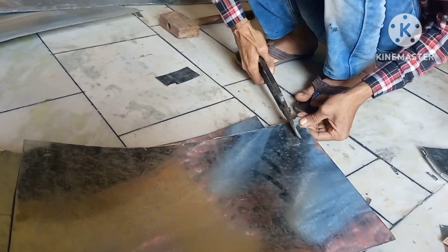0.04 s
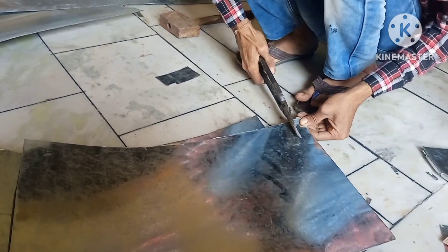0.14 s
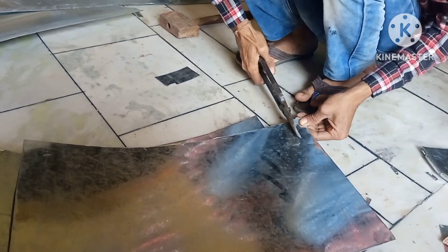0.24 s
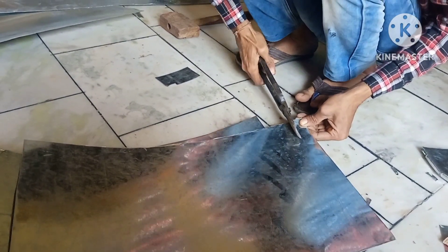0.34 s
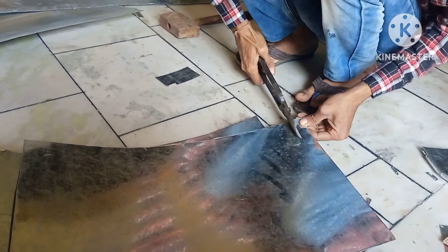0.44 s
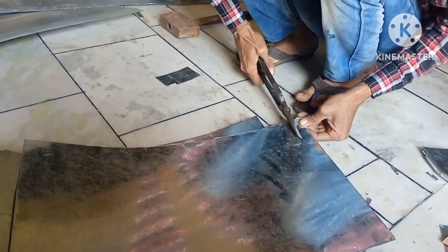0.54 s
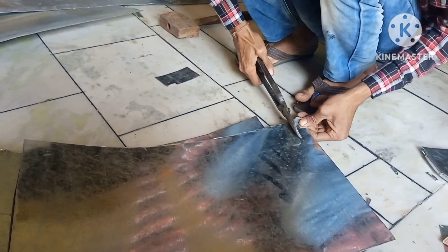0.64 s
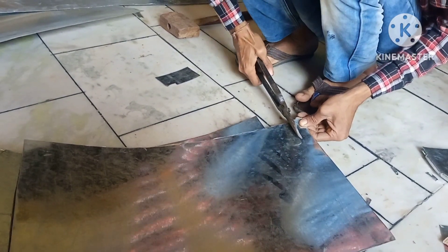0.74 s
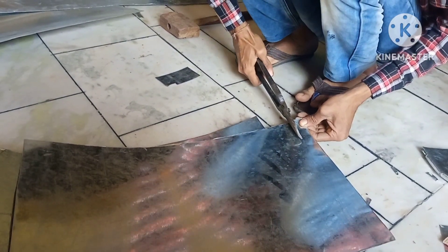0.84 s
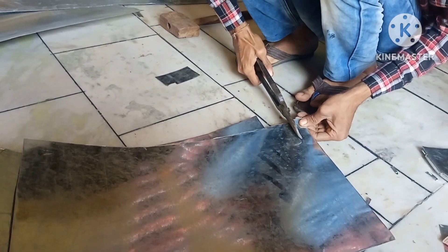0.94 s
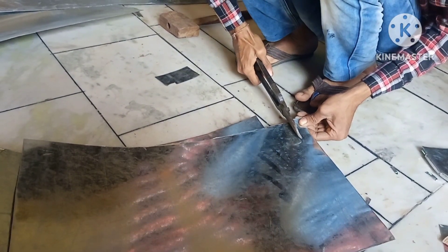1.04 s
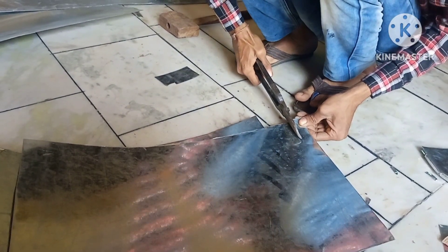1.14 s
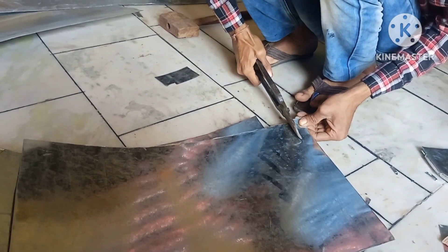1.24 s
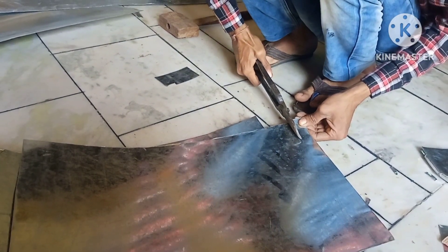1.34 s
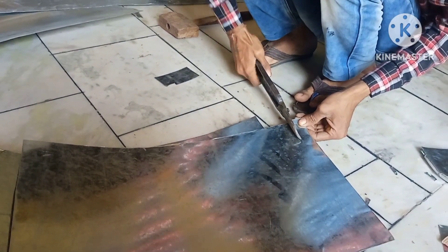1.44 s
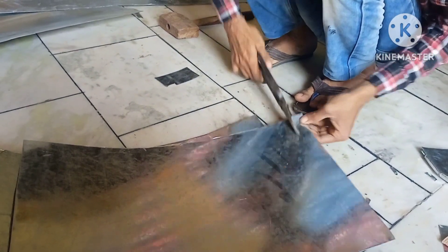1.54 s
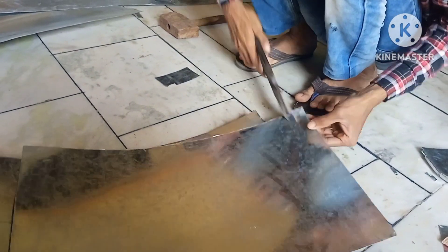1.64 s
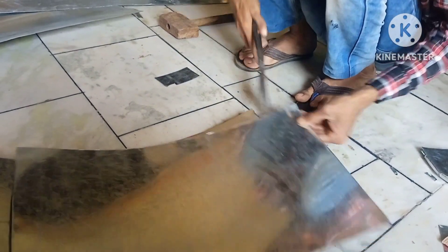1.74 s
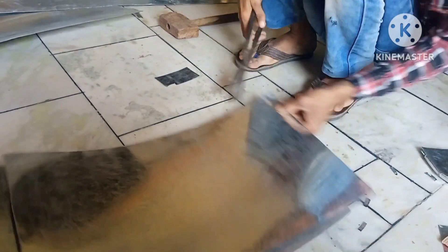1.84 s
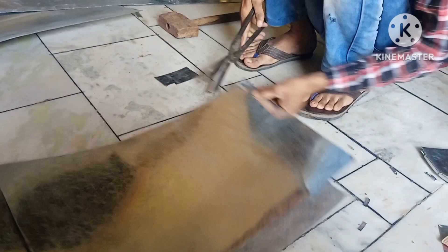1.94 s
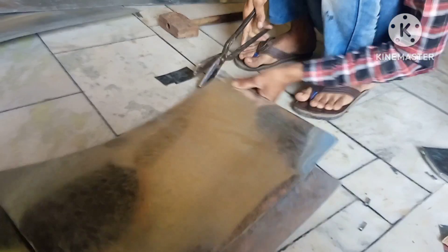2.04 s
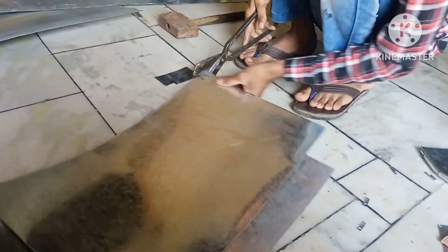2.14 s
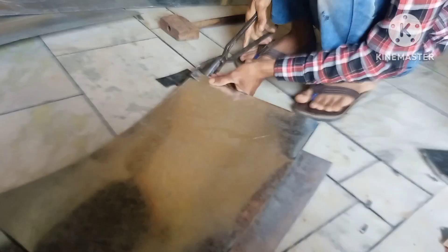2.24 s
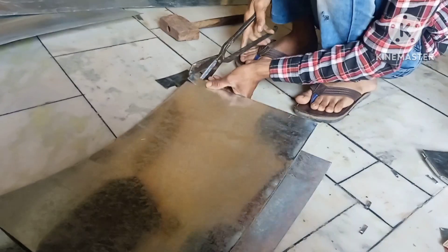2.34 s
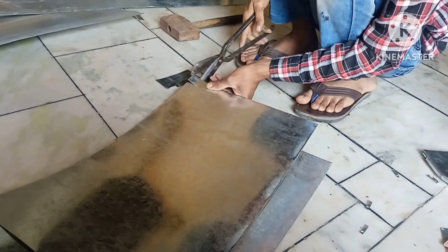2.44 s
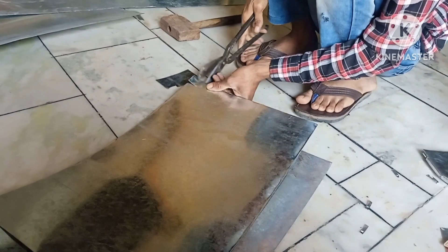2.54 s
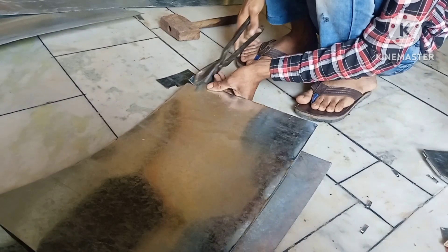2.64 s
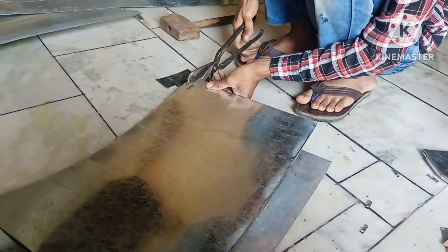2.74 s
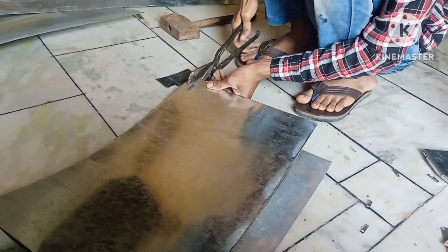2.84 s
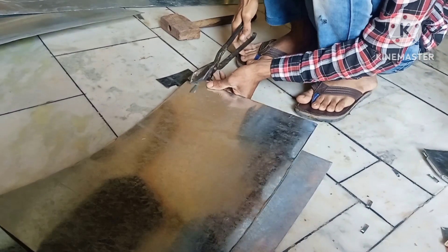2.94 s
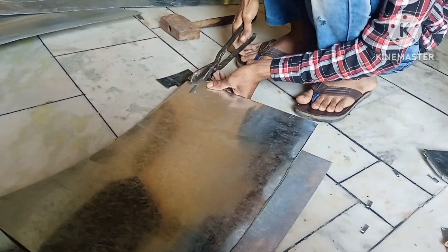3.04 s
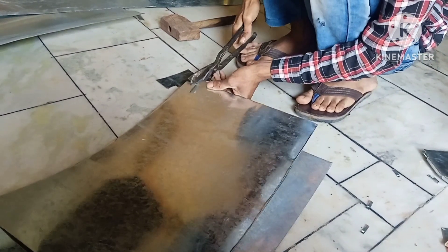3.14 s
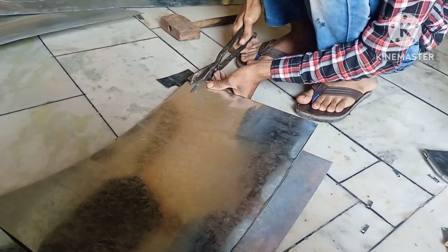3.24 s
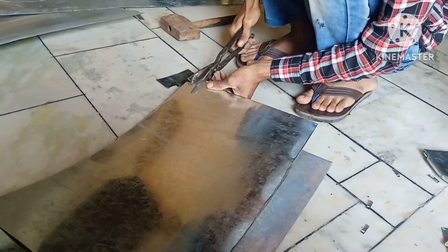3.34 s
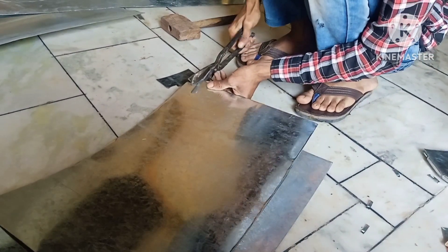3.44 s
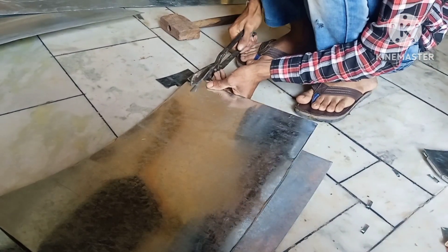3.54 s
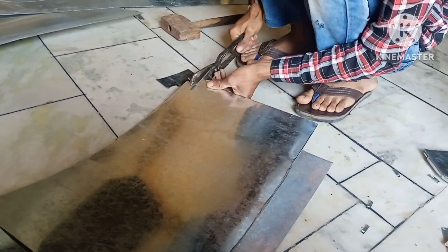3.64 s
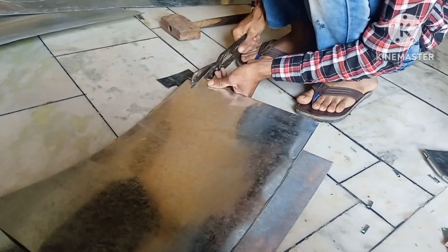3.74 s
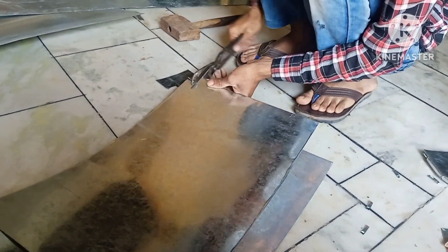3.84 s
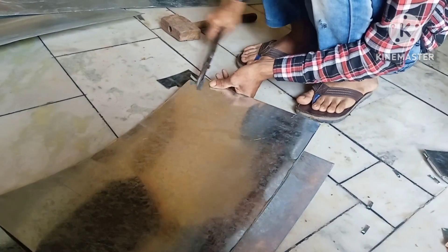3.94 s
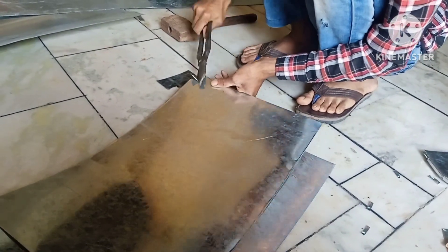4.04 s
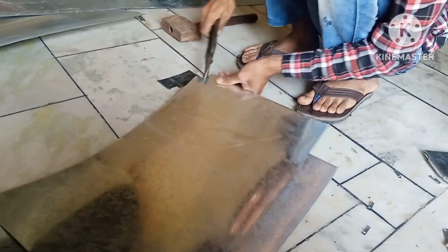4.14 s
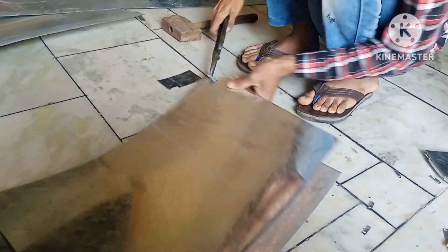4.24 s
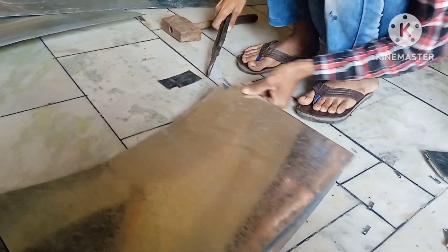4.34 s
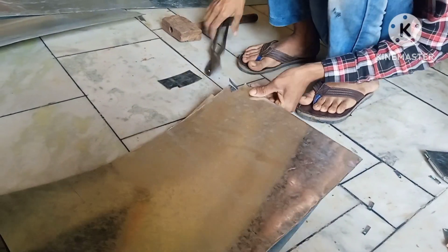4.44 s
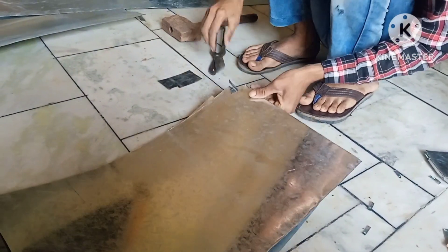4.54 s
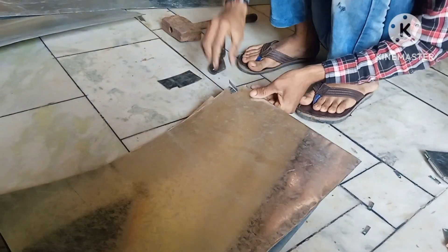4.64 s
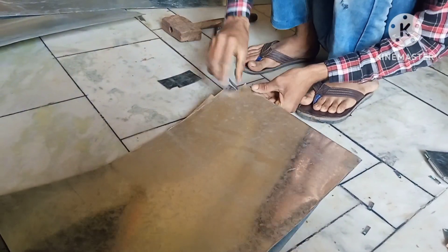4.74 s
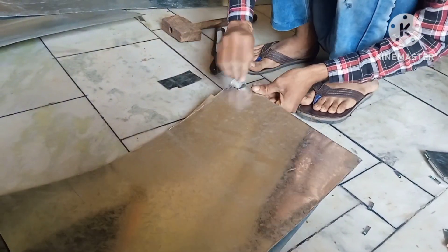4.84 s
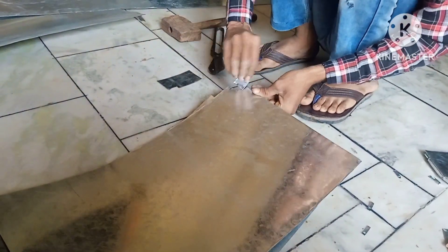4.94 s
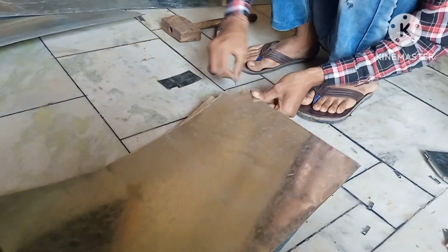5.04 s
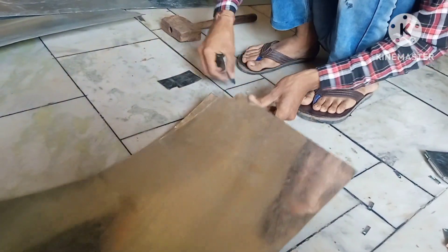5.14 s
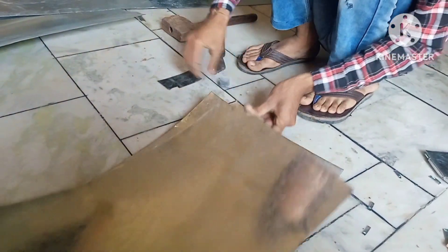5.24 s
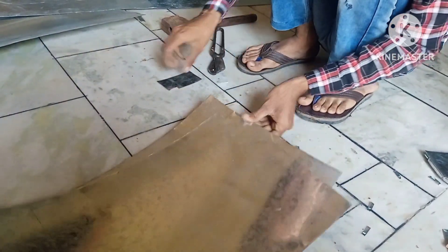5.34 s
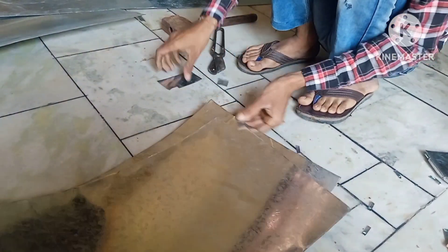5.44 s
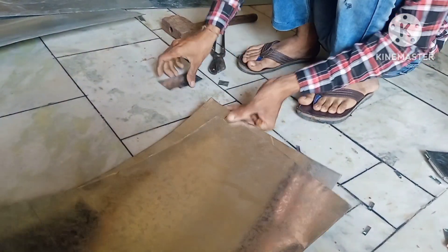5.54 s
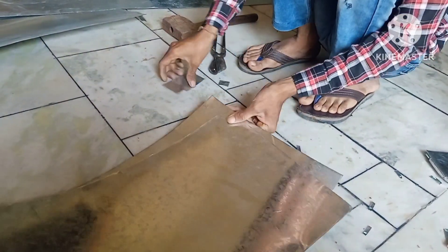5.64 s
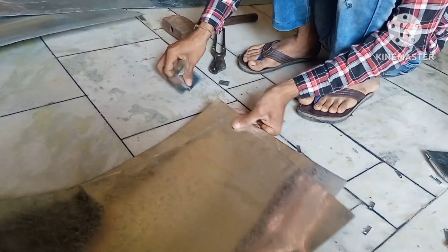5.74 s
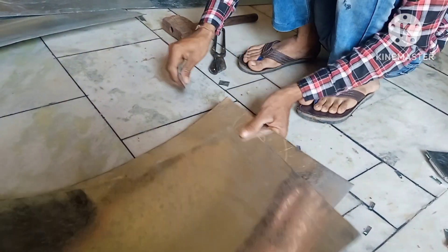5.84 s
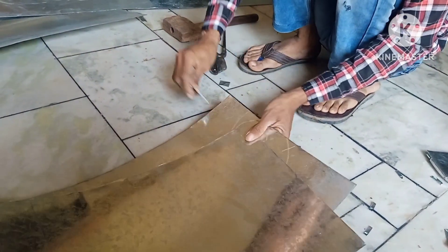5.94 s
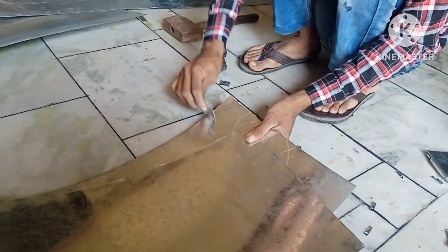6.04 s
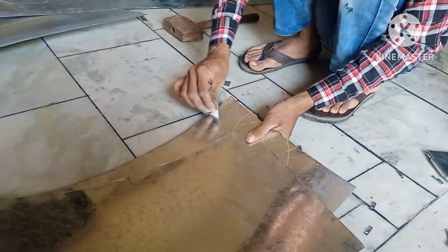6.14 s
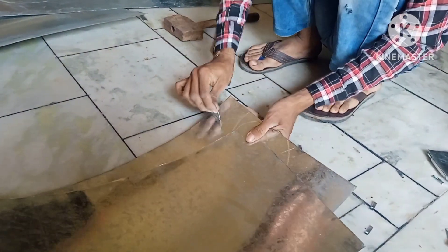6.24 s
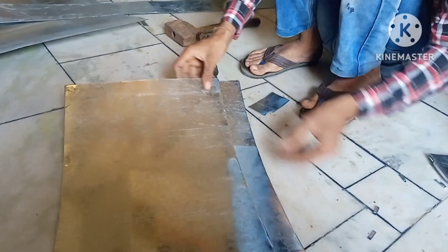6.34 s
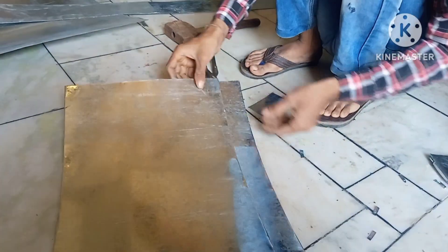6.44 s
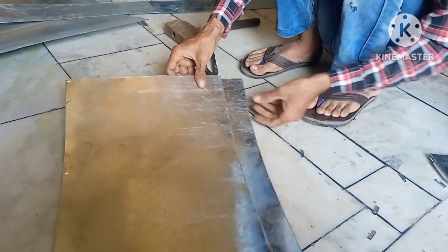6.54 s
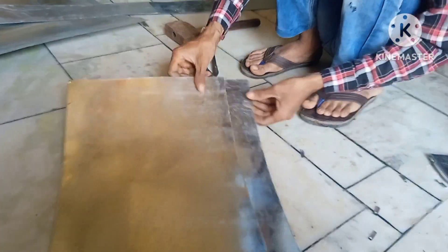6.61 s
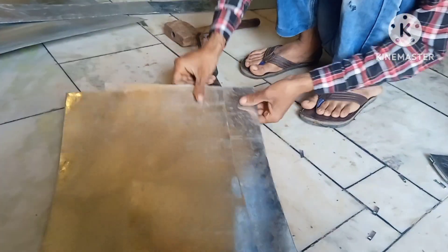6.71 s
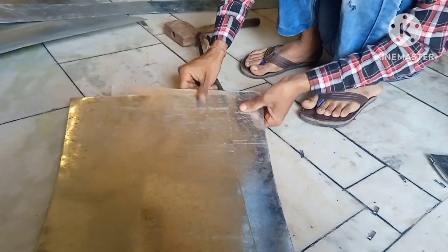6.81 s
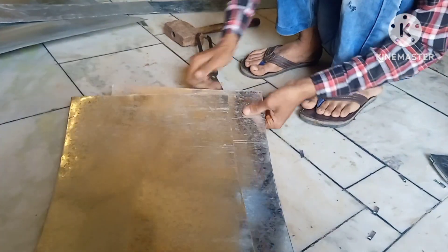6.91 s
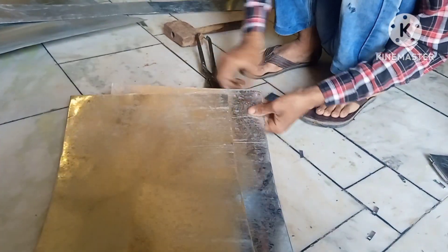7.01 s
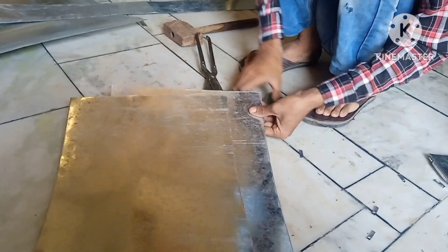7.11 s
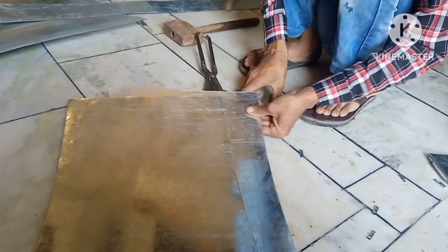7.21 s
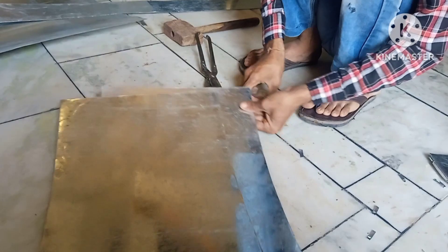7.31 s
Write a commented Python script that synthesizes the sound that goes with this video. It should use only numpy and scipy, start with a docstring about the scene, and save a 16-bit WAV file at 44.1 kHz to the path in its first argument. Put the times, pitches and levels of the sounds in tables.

```python
"""A thin galvanised sheet is dragged round in pushes on a tiled workshop floor and cut with tin snips.
Close to the microphone its edge sticks and slips, the plate shimmers, and it twangs in the blades.
The snips are put down and clatter on the tiles, a small offcut rings as it is scraped up,
and the sheet slaps down and slides. Farther off, hard walls answer over a low rumble."""
import sys
import numpy as np
from scipy import signal
from scipy.fft import rfft, irfft, next_fast_len
from scipy.io import wavfile

SR = 44100
rng = np.random.default_rng(int(sys.argv[2]) if len(sys.argv) > 2 else 0)


def bounce(signal):
    """Save signal as a 16-bit WAV file at the path given by the first command-line argument."""
    frames = np.transpose(np.atleast_2d(signal))
    limited = np.clip(frames, -1, 1)
    pcm = np.round(limited * 32767).astype(np.int16)
    wavfile.write(sys.argv[1], SR, pcm)


N = 325017


def amp(db):
    """Decibels to gain."""
    return 10 ** (np.asarray(db) / 20)


def unit(x):
    """Scale to rms 1."""
    return x / np.sqrt(np.mean(x ** 2) + 1e-20)


def along(points, hz):
    """Read a curve of (Hz, value) points on a log frequency axis."""
    freqs, values = np.transpose(points)
    return np.interp(np.log(hz + 1), np.log(freqs + 1), values)


def coloured(x, spectrum):
    """x through a causal filter with the given spectrum, at rms 1."""
    size = 4096
    gain = amp(along(spectrum, np.fft.rfftfreq(size, 1 / SR)))
    cepstrum = irfft(np.log(gain))
    cepstrum[1:size // 2] *= 2  # fold to minimum phase
    cepstrum[size // 2 + 1:] = 0
    response = irfft(np.exp(rfft(cepstrum)))
    return unit(signal.fftconvolve(x, response)[:len(x)])


def add(track, s, sound):
    """Mix a sound in at s seconds."""
    start = max(round(s * SR), 0)
    track[start:start + len(sound)] += sound[:N - start]


def burst(spectrum, t60, rise=0.00096):
    """A blow on countless overlapping modes that die together."""
    t = np.arange(SR // 2) / SR
    envelope = amp(-60 * t / t60) * np.minimum(t / rise, 1)
    return coloured(envelope * rng.standard_normal(len(t)), spectrum) * np.sqrt(np.mean(envelope ** 2))


def wobble(count, rate, size):
    """Smooth random curves of size samples, rate knots a second."""
    knots = np.arange(size) * rate / SR
    grid = np.arange(int(knots[-1]) + 2)
    return np.array([np.interp(knots, grid, rng.standard_normal(len(grid))) for _ in range(count)])


def ring(modes, sustain, rise, waver_hz):
    """A blow on clear modes whose pitch wavers as the contact shifts; sustain scales each base t60."""
    t = np.arange(SR // 2) / SR
    hz, db, t60 = np.transpose(modes)[:, :, None]
    gain = amp(db + 2 * rng.standard_normal(hz.shape))
    pitch = hz + waver_hz * wobble(count=len(hz), rate=119, size=len(t))
    phase = 2 * np.pi * (rng.random(hz.shape) + np.cumsum(pitch, axis=1) / SR)
    waves = gain * amp(-60 * t / (t60 * sustain)) * np.sin(phase)
    return waves.sum(0) * np.minimum(t / rise, 1) / np.sqrt(np.sum(gain ** 2) / 2)


def stroke(start, swell, hold, swell_db=15.5, ring_off_db_per_s=108):
    """Level in dB of one scrape: it gathers speed, holds, and the metal rings off."""
    t = np.arange(N) / SR - start
    gathering = np.clip(t / swell, 0, 1)
    stopped_s = np.maximum(t - swell - hold, 0)
    level = -swell_db * (1 - gathering) ** 1.17 - ring_off_db_per_s * stopped_s
    return np.where(t < 0, -np.inf, level)


def slips(rate, spread_db):
    """Stick-slip impulses of uneven size, rate a second."""
    size = amp(spread_db * np.minimum(rng.standard_normal(N), 2.5))
    return (rng.random(N) < rate / SR) * size * rng.choice([-1, 1], N)


def plate(x, t60, share):
    """The sheet's dense bending modes ring on after each impulse, and shift as it bends."""
    t = np.arange(SR // 4) / SR
    hop = SR // 8
    window = np.sqrt(np.hanning(2 * hop))
    out = np.zeros(N)
    for start in range(0, N, hop):
        piece = np.pad(x, hop)[start:start + 2 * hop]
        response = rng.standard_normal(len(t)) * amp(-60 * t / t60)
        rung = signal.fftconvolve(piece * window[:len(piece)], response)
        add(out, max(start - hop, 0) / SR, rung[max(hop - start, 0):])
    return unit(x) + share * unit(out)


# The metal's low flex, middle rasp and high grit. Each row: frequency in Hz, relative level in dB.
FLEX_SPECTRUM = [(100, -43.5), (180, -15.5), (260, -15.5), (340, -19), (470, -16), (600, -4), (720, 0.5),
                 (1100, 3.5), (1500, -9), (2200, -27), (5000, -69.5)]
RASP_SPECTRUM = [(500, -36.5), (1000, -20), (1450, 6.5), (1900, 7), (2500, 4), (3200, -1.5), (4200, -18),
                 (7000, -20.5), (15000, -70.5)]
GRIT_SPECTRUM = [(60, -65.5), (1500, -30), (3500, 9), (5000, 5.5), (6500, 5.5), (8500, -0.5), (11000, -3.5),
                 (13500, -12.5), (15200, 3)]
# Scrapes of metal: the sheet pushed across the floor, two faint blade scrapes, and the offcut's gritty
# scrape. Each row: start, swell and hold in seconds, flex, rasp and grit levels in dB.
METAL_SCRAPES = [ (0.0, 0.0017, 0.013, -44.5, -51.5, -67), (0.15, 0.011, .1, -56, -65.5, -81),
                 (0.92, 0.026, .02, -74, -78, -97), (1.17, 0.044, 0.023, -76, -74.5, -92),
                 (1.576, 0.044, .06, -51, -54, -64.5), (1.633, 0.067, 0.065, -50, -43.5, -45.5),
                 (1.745, 0.018, 0.046, -36, -33.5, -41.5), (1.76, 0.19, .27, -40, -34, -44),
                 (1.987, 0.18, 0.14, -41.5, -35.5, -43), (2.282, 0.0085, 0.044, -36.5, -45, -55),
                 (2.737, 0.054, 0.013, -40.5, -41.5, -55), (2.98, 0.018, 0.033, -76, -60.5, -73.5),
                 (3.492, 0.26, .035, -53, -59, -83), (3.746, 0.024, 0.052, -79, -69, -66),
                 (3.922, 0.069, 0.22, -65.5, -57, -61), (4.135, .03, 0.017, -55.5, -46.5, -53.5),
                 (4.207, 0.059, 0.069, -39.5, -36, -42), (4.886, 0.047, 0.045, -48.5, -44.5, -64),
                 (5.048, 0.0098, 0.032, -45, -48, -77), (5.136, 0.2, 0.081, -38, -35, -42),
                 (5.434, 0.019, 0.19, -74, -65, -52), (5.654, 0.018, 0.012, -42.5, -42.5, -50.5),
                 (5.747, 0.099, 0.13, -40.5, -35, -45.5), (6.163, 0.096, 0.065, -52, -36, -64),
                 (6.302, 0.012, 0.037, -42, -34.5, -41), (6.54, .03, .06, -52, -51, -57.5),
                 (6.635, 0.062, 0.028, -40.5, -39, -51), (6.786, .035, 0.02, -48, -52.5, -58),
                 (6.88, 0.073, 0.17, -68, -62.5, -72.5), (7.137, 0.19, .09, -57.5, -58, -56.5), ]


def scrapes(grit_grows=1.2):
    """Close by, scraping metal sticks and slips: fine grit on top, the plate shimmering below."""
    flex_power, rasp_power, grit_power = np.zeros((3, N))
    for start, swell, hold, flex_db, rasp_db, grit_db in METAL_SCRAPES:
        effort_db = stroke(start, swell, hold)
        flex_power += amp(effort_db + flex_db) ** 2
        rasp_power += amp(effort_db + rasp_db) ** 2
        grit_power += amp(grit_grows * effort_db + grit_db) ** 2  # grit follows the speed more steeply
    shimmer = plate(slips(rate=900, spread_db=2.5), t60=0.35, share=1.01)
    scratch = plate(slips(rate=4500, spread_db=3), t60=0.056, share=0.66)
    flex = np.sqrt(flex_power) * coloured(shimmer, FLEX_SPECTRUM)
    rasp = np.sqrt(rasp_power) * coloured(shimmer, RASP_SPECTRUM)
    grit = np.sqrt(grit_power) * coloured(scratch, GRIT_SPECTRUM)
    return flex + rasp + grit


# The workshop's hiss. Each row: frequency in Hz, relative level in dB.
AIR_SPECTRUM = [(25, -25), (55, -18.5), (100, -35), (200, -13), (270, -9.5), (450, -8.5), (700, -13.5),
                (1300, -12), (2300, -16.5), (3800, -28.5), (8000, -35.5), (15800, -45.5)]
# The drone behind the work. Each row: time in seconds, hum level in dB, deep rumble level in dB.
DRONE_LEVELS = [(0, -65.5, -72), (1.5, -67.5, -76.5), (2.8, -68, -82), (4.2, -66.5, -81),
                (5.3, -72.5, -77.5), (6.2, -73.5, -74.5), (7.37, -80.5, -70)]


def room_tone(air_db=-73):
    """A low drone and a faint hiss fill the workshop around the microphone."""
    times, *levels = np.transpose(DRONE_LEVELS)
    hum_gain, deep_gain = [amp(np.interp(np.arange(N) / SR, times, db)) for db in levels]
    hum_spectrum = [(50, -49.5), (85, -6.5), (115, -6), (145, 3), (180, -10), (260, -14), (600, -33),
                    (2000, -82.5)]
    deep_spectrum = [(20, -41.5), (42, -7.5), (60, 8.5), (85, -2), (130, -18.5), (1000, -84.5)]
    hum = hum_gain * coloured(rng.standard_normal(N), hum_spectrum)
    deep = deep_gain * coloured(rng.standard_normal(N), deep_spectrum)
    return hum + deep + amp(air_db) * coloured(rng.standard_normal(N), AIR_SPECTRUM)


# The struck sheet and the floor under it. Each row: frequency in Hz, relative level in dB.
BODY_SPECTRUM = [(100, -39.5), (220, -26.5), (400, -26), (520, -22), (700, -2), (1200, -1), (1800, 0.5),
                 (2500, -3.5), (3200, -5.5), (4200, -21.5), (7000, -26.5), (15000, -63.5)]
THUD_SPECTRUM = [(25, -52.5), (60, -19), (110, -17.5), (170, -4), (215, 4), (260, -5), (320, -6.5),
                 (480, -7), (650, -1.5), (1200, -48)]
# Knocks on the sheet. Each row: start in seconds, relative levels of body and edge in dB.
SHEET_KNOCKS = [(0.158, -40.5, -61), (0.226, -40, -59), (1.584, -67, -83), (2.289, -23.5, -37),
                (2.647, -30.5, -45.5), (2.751, -31.5, -50), (3.152, -31.5, -60), (5.071, -35, -51),
                (6.114, -8.5, -28), (6.173, -16, -35), (6.299, -28, -29)]


def knocks(body_db=-6, edge_db=-3, thud_db=-42, thud_grows=0.23):
    """The sheet slaps down: a short crash, a bright edge and a floor thud that grows less with force."""
    out = np.zeros(N)
    for s, body, edge in SHEET_KNOCKS:
        add(out, s, amp(body + body_db) * burst(BODY_SPECTRUM, t60=0.11, rise=0.0041))
        add(out, s, amp(edge + edge_db) * burst(GRIT_SPECTRUM, t60=0.15))
        add(out, s, amp(thud_grows * body + thud_db) * burst(THUD_SPECTRUM, t60=0.035))
    return out


# Soft bumps. Each row: start in seconds, level in dB.
HANDLING_BUMPS = [(0.832, -69), (1.339, -58.5), (7.15, -61.5)]


def bumps():
    """Faint, dull bumps while the sheet is handled."""
    spectrum = [(150, -24), (290, 1), (350, 4), (450, -23), (1200, -45), (4000, -72)]
    out = np.zeros(N)
    for s, level in HANDLING_BUMPS:
        add(out, s, amp(level) * burst(spectrum, t60=0.13))
    return out


# The sheet held in the blades. Each row: mode frequency in Hz, relative level in dB, base t60 in seconds.
CLAMPED_MODES = [(765, 0, .38), (805, -5, .25), (872, -6, .25), (930, -8, .35), (985, -7, .3),
                 (1163, -12, .3), (1685, -5, .2), (1810, -7, .17), (1920, -7, .19), (2116, -7, .22)]


def bite(s=2.783):
    """Near the microphone the blades tear through with a crunch and the clamped sheet twangs."""
    out = np.zeros(N)
    add(out, s, amp(-26.5) * ring(CLAMPED_MODES, sustain=0.92, rise=0.016, waver_hz=19.4))
    add(out, s + 0.002, amp(-40.5) * burst(BODY_SPECTRUM, t60=0.12, rise=0.01))
    add(out, s, amp(-43.5) * burst(GRIT_SPECTRUM, t60=0.12, rise=0.0059))
    add(out, s, amp(-40) * burst(THUD_SPECTRUM, t60=0.15, rise=0.0058))
    return out


# Small dry ticks. Each row: start in seconds, relative level in dB.
BLADE_TICKS = [(2.956, -47.5), (3.141, -49), (3.175, -52), (3.58, -55.5), (3.612, -54.5), (3.837, -45),
               (4.095, -41.5), (5.978, -26), (6.585, -40)]


def ticks(gain_db=1):
    """Blade and burr catch briefly."""
    spectrum = [(80, -51.5), (500, -9), (2200, 4), (6000, -14), (15000, -30.5)]
    out = np.zeros(N)
    for s, level in BLADE_TICKS:
        add(out, s, amp(level + gain_db) * burst(spectrum, t60=0.025, rise=0.00037))
    return out


# The sheet booming on the floor. Each row: frequency in Hz, relative level in dB, base t60 in seconds.
BOOM_MODES = [(182, -3.5, .2), (205, 0.5, 0.17), (238, -4, 0.12), (347, -10, 0.33)]
# The snips land part by part. Each row: start in seconds, relative thud, clash and ring levels in dB.
SNIPS_LANDINGS = [(4.351, -26, -25, -35), (4.548, -22.5, -31, -21), (4.562, -45.5, -25.5, -23.5),
                  (4.59, -37.5, -24, -23), (4.637, -25.5, -24.5, -24.5), (4.68, -33.5, -35, -32.5),
                  (4.745, -39, -45.5, -46)]


def landings(thud_db=-6, boom_db=-11, body_db=1, edge_db=1):
    """The weight of the snips thuds on the floor, cracks on the tile and jolts the sheet."""
    out = np.zeros(N)
    for s, thud, _, _ in SNIPS_LANDINGS:
        add(out, s, amp(thud + thud_db) * burst(THUD_SPECTRUM, t60=0.064))
        add(out, s, amp(thud + boom_db) * ring(BOOM_MODES, sustain=0.51, rise=0.0086, waver_hz=6))
        add(out, s, amp(thud + body_db) * burst(BODY_SPECTRUM, t60=0.054))
        add(out, s, amp(thud + edge_db) * burst(GRIT_SPECTRUM, t60=0.029))
    return out


# The forged snips. Each row: mode frequency in Hz, relative level in dB, base t60 in seconds.
SNIPS_MODES = [(2490, -11, .4), (2711, -2, .6), (3050, -8, .42), (3805, -11, .35), (3839, -9, .4),
               (4048, -9, .45), (4085, -4, .55), (4904, -13, .35), (5023, -12, .35), (5700, -11, .35),
               (5849, -2, .5), (6422, -11, .35), (6735, -7, .4), (7052, -8, .35), (7903, -12, .3),
               (8586, -3, .35), (8620, -6, .33), (8663, -5, .33), (8839, -8, .35), (9600, -8, .35),
               (10707, -13, .35), (11350, -11, .27), (11477, -11, .27), (12560, -10, .28),
               (14580, -10, .27), (14955, -8, .24), (15446, -8, .22)]
# The clash of the arms. Each row: frequency in Hz, relative level in dB.
CLASH_SPECTRUM = [(60, -56.5), (300, -34.5), (800, -19.5), (2200, 0), (3500, -3.5), (5200, -4.5), (6800, 5),
                  (8100, -5.5), (8750, -2.5), (10300, -5.5), (12600, -20.5), (13700, -24), (15100, -1)]
# The tips grazing the tiles. Each row: start in seconds, level in dB.
TIP_GRAZES = [(4.516, -40), (4.533, -39.5), (4.874, -57.5), (5.058, -64)]


def snips(clash_db=-5, ring_db=-1, tilt_db_per_octave=-0.5, contacts=4):
    """The loose arms rebound ever faster; each contact clashes and rings the steel out into the room."""
    first_flight_s, flight_shrink, bounce_loss_db = 0.014, 0.85, 5
    clatter, steel = np.zeros((2, N))
    # a flat landing on tile favours the low modes
    lowest_hz = SNIPS_MODES[0][0]
    struck = [(hz, db + tilt_db_per_octave * np.log2(hz / lowest_hz), t60) for hz, db, t60 in SNIPS_MODES]
    for s, _, clash, level in SNIPS_LANDINGS:
        for k in range(contacts):
            add(clatter, s, amp(clash + clash_db - bounce_loss_db * k) * burst(CLASH_SPECTRUM, t60=0.23))
            ringing = ring(struck, sustain=0.7, rise=0.0013, waver_hz=20.8)
            add(steel, s, amp(level + ring_db - bounce_loss_db * k) * ringing)
            s += first_flight_s * flight_shrink ** k
    # a light graze wakes only the high modes
    high_modes = [mode for mode in SNIPS_MODES if mode[0] > 8200]
    for s, level in TIP_GRAZES:
        add(steel, s, amp(level) * ring(high_modes, sustain=0.56, rise=0.003, waver_hz=50))
    return room(clatter, wet_db=1.5) + room(steel, wet_db=-4)


# The small offcut. Each row: mode frequency in Hz, relative level in dB, base t60 in seconds.
OFFCUT_MODES = [(5344, -13, .4), (6640, -17, .25), (6762, -5, .22), (6793, 0, .24), (6900, -20, .15),
                (8522, -23, .22), (9760, -17, .24), (9850, -18, .22), (14950, -17, .16)]
# Its edge catching on the tiles. Each row: start in seconds, level in dB.
OFFCUT_CATCHES = [(5.282, -33.5), (5.303, -24.5), (5.36, -34.5), (5.468, -19), (5.499, -21), (5.579, -41.5)]


def offcut(skip_count=4, skip_gap_s=0.03, skip_db=-14, skip_loss_db=0.5):
    """A small scrap sings each time its edge catches and skips over the tiles; the fingers damp it."""
    out = np.zeros(N)
    for s, level in OFFCUT_CATCHES:
        skips = [(s + skip_gap_s * (k + rng.uniform(0.5, 1)), level + skip_db - skip_loss_db * k)
                 for k in range(skip_count)]
        for when, db in [(s, level)] + skips:
            add(out, when, amp(db) * ring(OFFCUT_MODES, sustain=0.57, rise=0.0089, waver_hz=26.5))
    return out


# The workshop's reverberation. Each row: frequency in Hz, t60 in seconds.
ROOM_DECAY = [(150, 0.81), (600, 1), (1500, 0.62), (4000, 0.57), (9000, 0.39), (15000, 0.15)]


def room(x, wet_db, onset_s=0.0034):
    """Hard walls answer behind the direct sound; the treble dies first."""
    hz, t, noise = signal.stft(rng.standard_normal(SR), SR, nperseg=256)
    decay = amp(-60 * t / along(ROOM_DECAY, hz)[:, None])
    tail = signal.istft(noise * decay, SR, nperseg=256)[1]
    tail *= np.clip(np.arange(len(tail)) / SR / onset_s, 0, 1)
    return x + amp(wet_db) * signal.fftconvolve(x, tail / np.linalg.norm(tail))[:N]


def scene():
    """The workshop from one spot, in mono: the scrapes sound closest, the blows fill the room."""
    blows = room(knocks() + landings() + bumps(), wet_db=-5)
    cutting = room(ticks() + bite(), wet_db=-12)
    loose_metal = snips() + room(offcut(), wet_db=-11)
    scraping = room(scrapes(), wet_db=-18.5)
    return (blows + cutting + loose_metal + scraping + room_tone())[None]


def record(dry, top_hz=15650):
    """The microphone is a phone's, which keeps nothing above its band limit."""
    size = next_fast_len(N + SR // 2)
    passband = np.fft.rfftfreq(size, 1 / SR) < top_hz
    return irfft(rfft(dry, size) * passband, size)[:, :N]


dry = scene()
out = record(dry)
bounce(out)
```